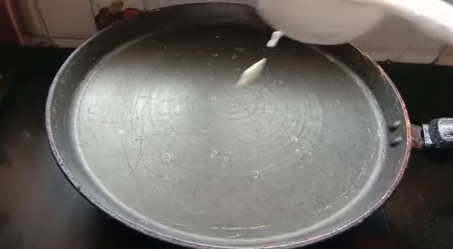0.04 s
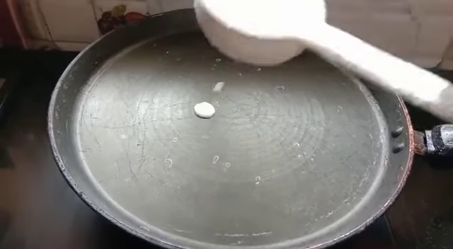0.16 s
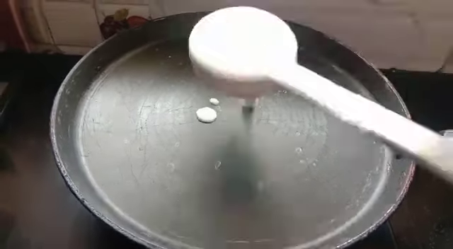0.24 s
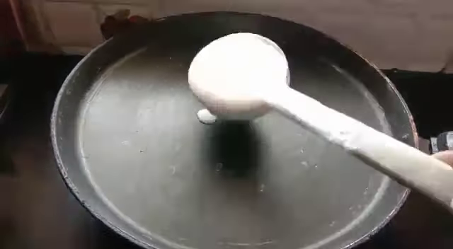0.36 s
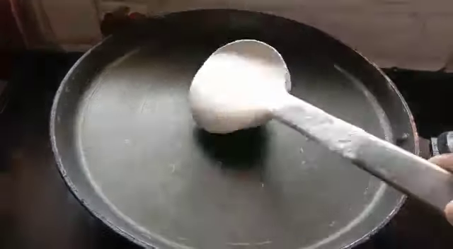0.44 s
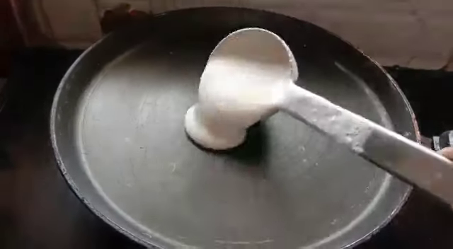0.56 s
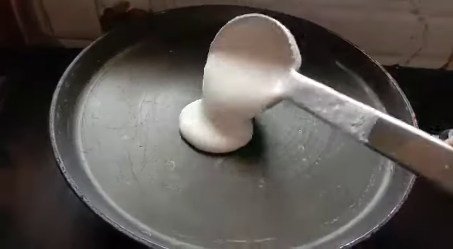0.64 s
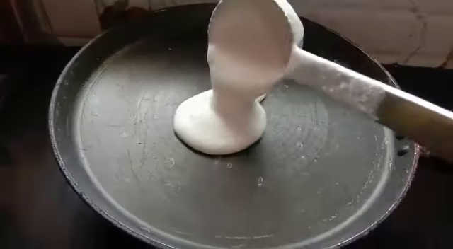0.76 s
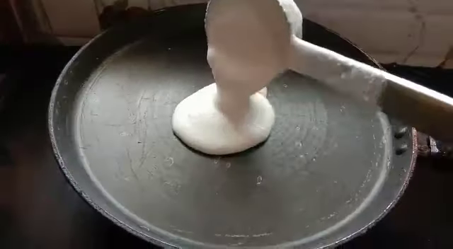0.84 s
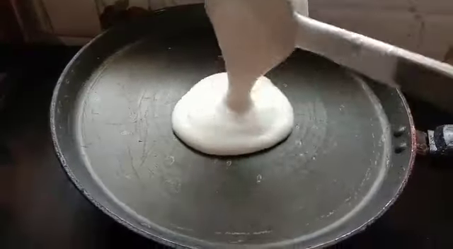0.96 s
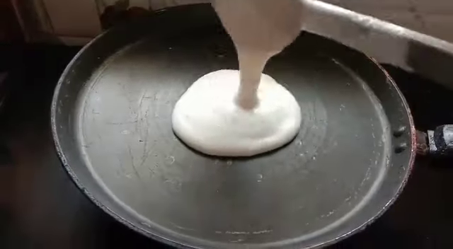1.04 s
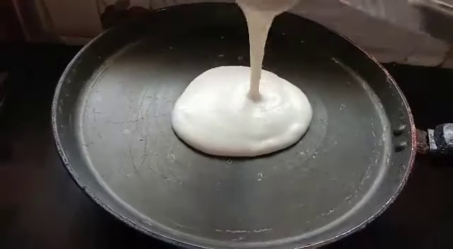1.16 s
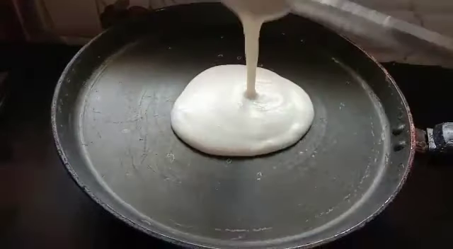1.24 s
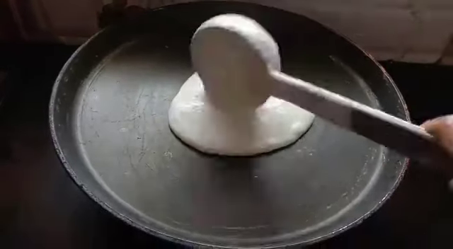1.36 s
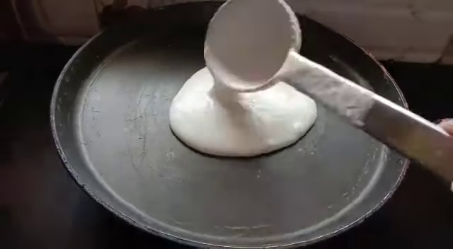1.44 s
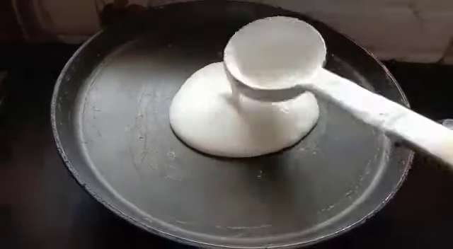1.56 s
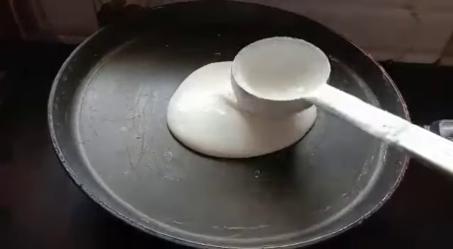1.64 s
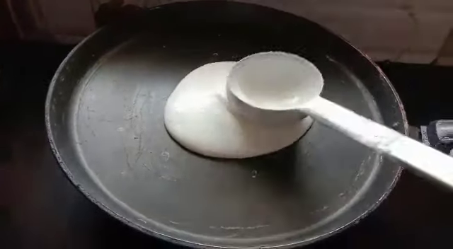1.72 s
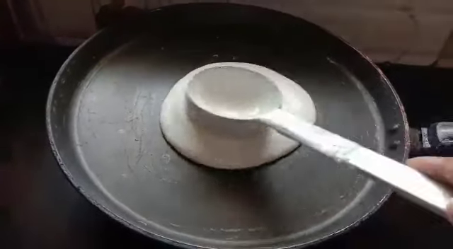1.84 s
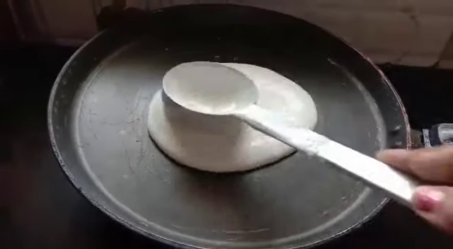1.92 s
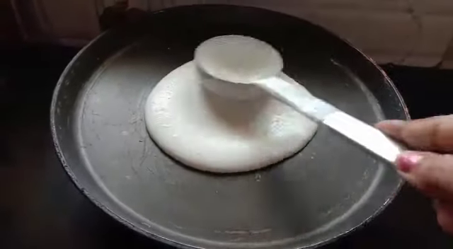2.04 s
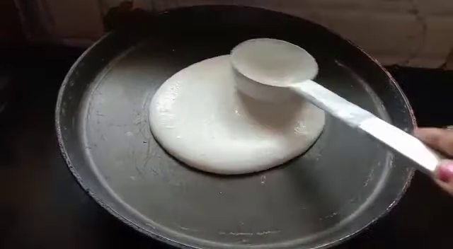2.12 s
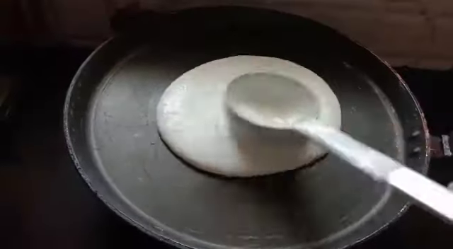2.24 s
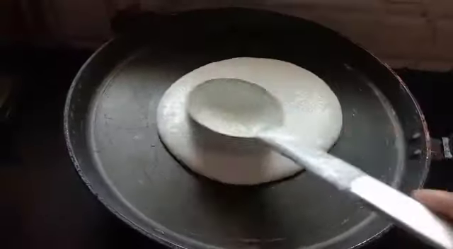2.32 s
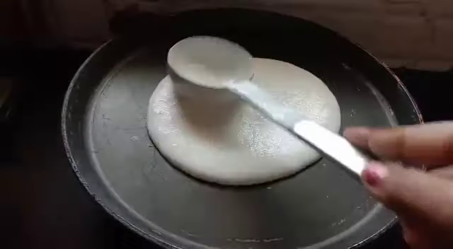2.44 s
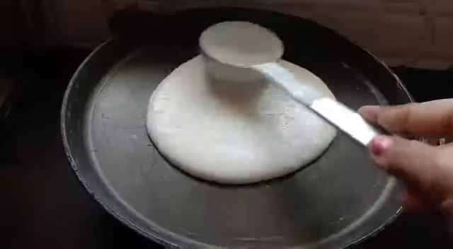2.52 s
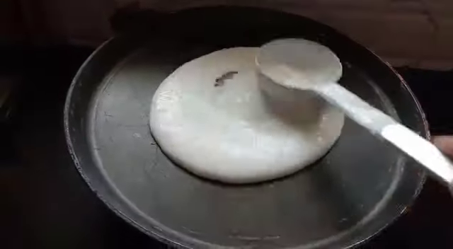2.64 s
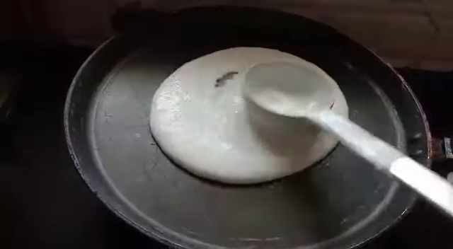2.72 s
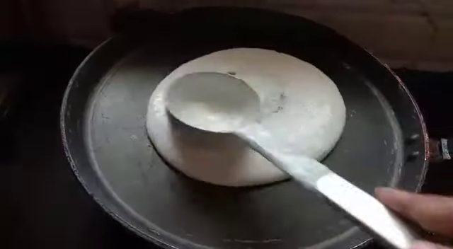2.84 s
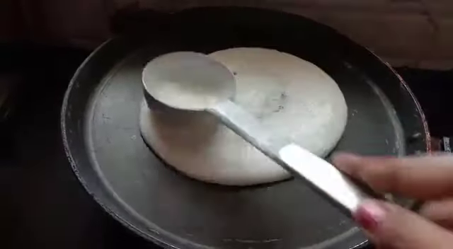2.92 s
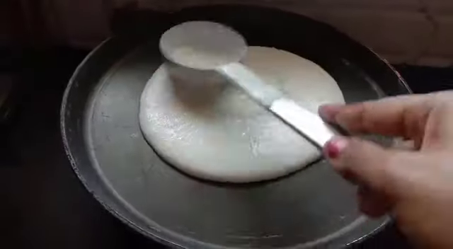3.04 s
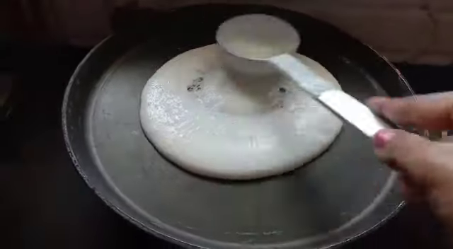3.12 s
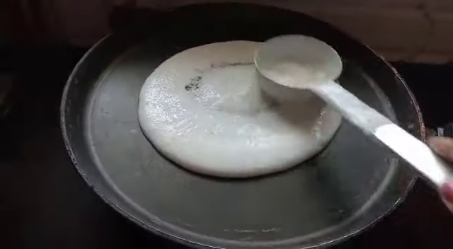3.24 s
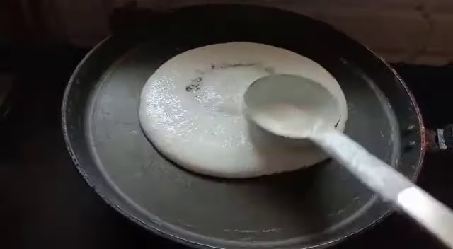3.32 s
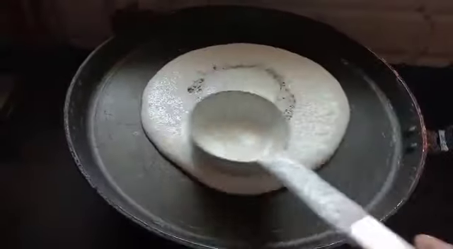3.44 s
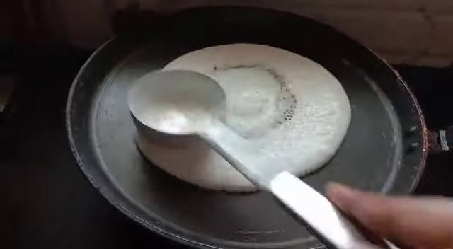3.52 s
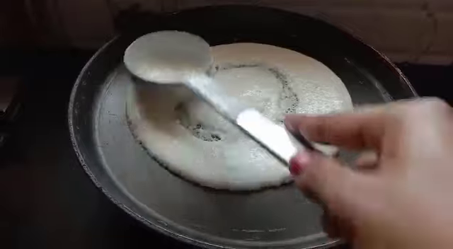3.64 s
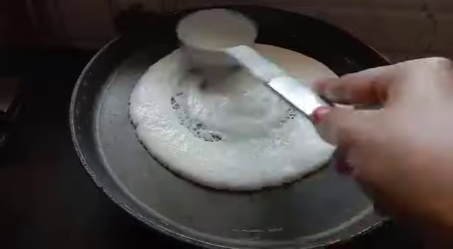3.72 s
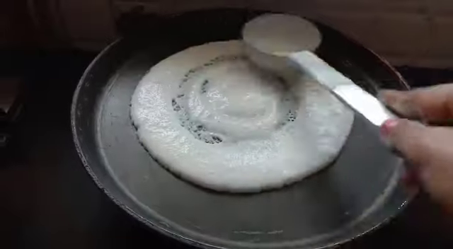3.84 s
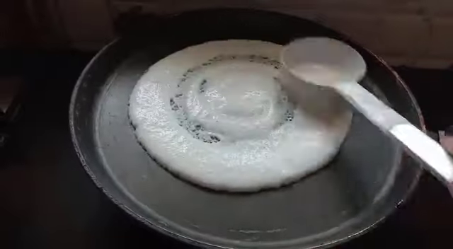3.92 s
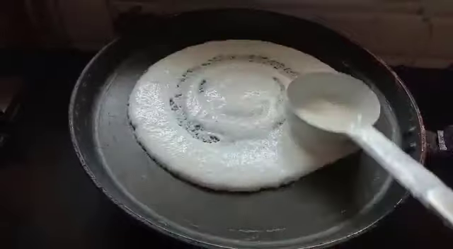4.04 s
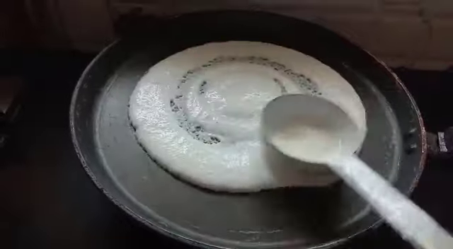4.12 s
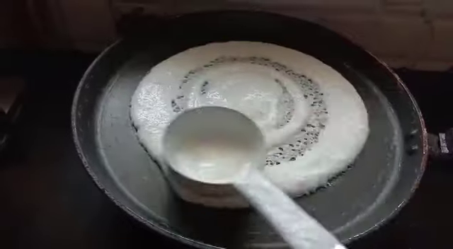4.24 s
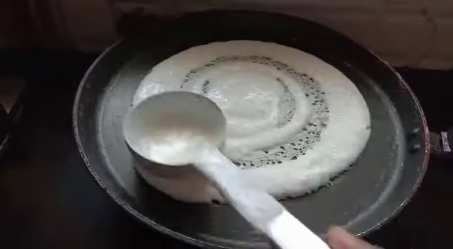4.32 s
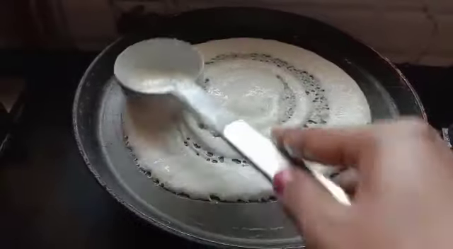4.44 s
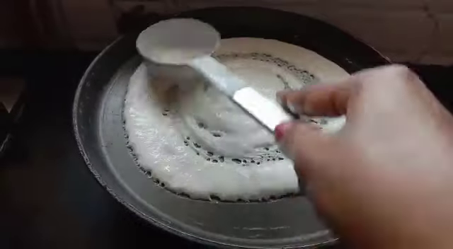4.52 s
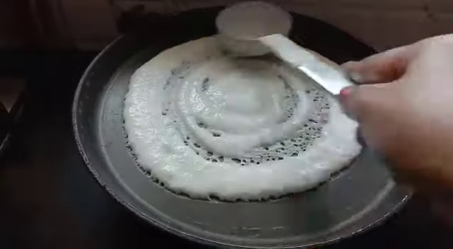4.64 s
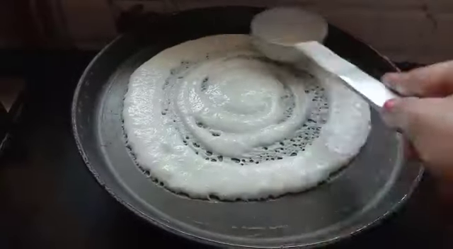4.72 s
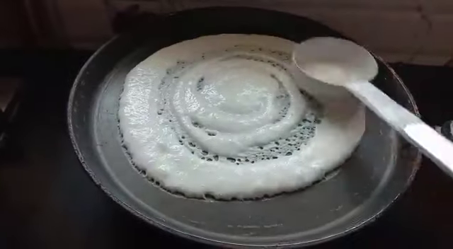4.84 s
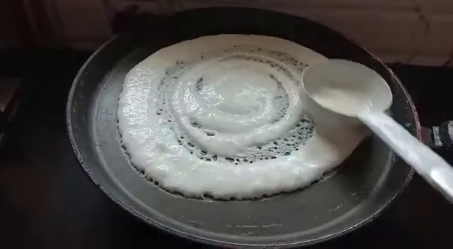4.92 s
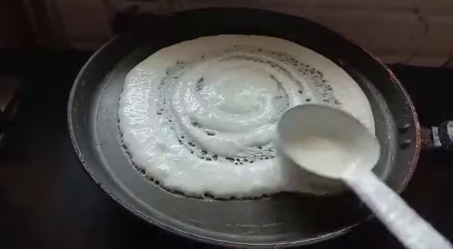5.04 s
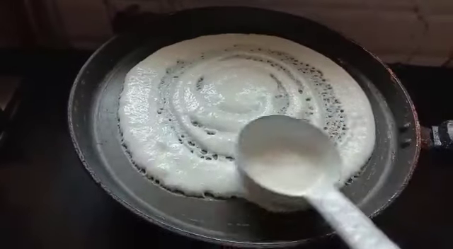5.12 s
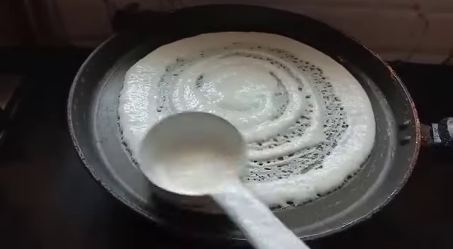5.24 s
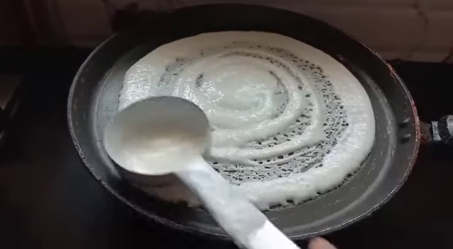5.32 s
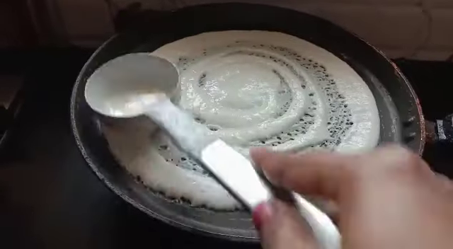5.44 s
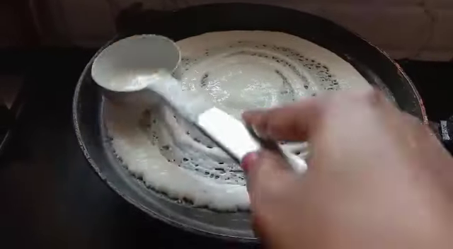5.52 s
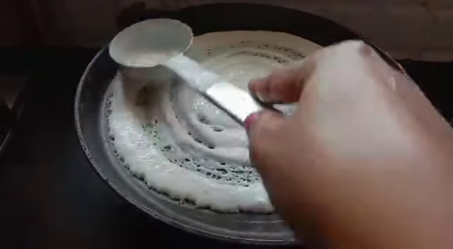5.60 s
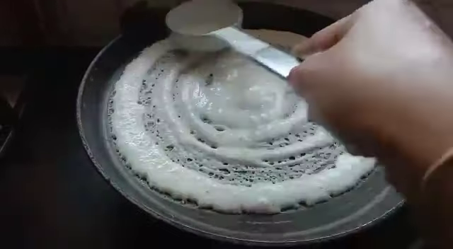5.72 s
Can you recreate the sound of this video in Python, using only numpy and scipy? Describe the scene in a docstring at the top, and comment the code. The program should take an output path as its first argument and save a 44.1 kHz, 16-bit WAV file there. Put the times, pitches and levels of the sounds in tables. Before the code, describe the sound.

Wet batter hits a hot griddle with small hissing splashes, then sizzles ever louder and crackles as a ladle spreads it in circles.

```python
"""Wet batter sizzles on a hot flat griddle, poured and spread by ladle over a gas flame in a small kitchen.
The microphone is close and nearly mono. Tiny steam bursts, made as random clicks, merge into a hiss that
swells with each splash and stroke; larger bubbles sputter, pinholes sing, short crackles stand out, the
ladle squelches. The plate rings as narrow resonances of random knocks. Behind it lie gas jets, the flame's
roar, a low drone and a murmur, as shaped noise, faint gliding tone blips, and quick echoes off close tiles."""
import sys
import numpy as np
from scipy import signal
from scipy.fft import rfft, irfft, next_fast_len
from scipy.io import wavfile
from scipy.ndimage import uniform_filter1d

SR = 44100
rng = np.random.default_rng(int(sys.argv[2]) if len(sys.argv) > 2 else 0)


def transcribe(u):
    """Save the signal u as a 16-bit wav file named by the first command-line argument.

    u: samples, shape (n,) or (channels, n), limited to [-1, 1]; the rate is SR.
    q: integer samples, one column per channel.
    """
    v = np.clip(np.atleast_2d(u).T, -1, 1)
    q = np.round(v * 32767).astype(np.int16)
    wavfile.write(sys.argv[1], SR, q)


N = 254456
TIME = np.arange(N) / SR

# room rumble that differs between the sides: (f/Hz, relative level/dB per Hz)
SIDE_RUMBLE_SPECTRUM = [(20, -6), (80, 1), (130, -5), (210, 3), (320, -7), (450, -40), (1500, -58)]
# low drone of the stove and kitchen, in two bands: (f/Hz, relative level/dB per Hz)
DEEP_DRONE_SPECTRUM = [(15, -39), (40, -15.5), (58, -16), (70, -9.5), (79, 9.5), (88, -7), (100, -10),
                       (140, -14.5), (180, -33), (400, -80)]
UPPER_DRONE_SPECTRUM = [(100, -41), (170, -9), (190, -5.5), (209, 8.5), (232, -11.5), (270, -4.5),
                        (320, -17.5), (400, -79), (800, -95)]
# brief swells of the deep drone: (middle t/s, length t/s, added level/dB)
DEEP_DRONE_SWELLS = [(0.844, 0.13, -49), (2.098, 0.74, -58.5), (4.592, 0.22, -47.5), (5.257, 0.18, -51)]
# middle level of the upper drone: (t/s, level/dB)
UPPER_DRONE_CURVE = [(0, -55), (.45, -63.5), (1.3, -61.5), (2.1, -55.5), (2.9, -52.5), (3.6, -54.5),
                     (3.95, -58.5), (4.35, -60.5), (4.6, -71.5), (5.2, -54), (5.77, -56.5)]
# hiss of the gas jets: (f/Hz, relative level/dB per Hz)
JET_SPECTRUM = [(600, -74), (800, -19), (1100, -5.5), (1330, 3.5), (1700, 0), (1950, 9.5), (2150, 2),
                (2650, -14), (3300, -10.5), (5500, -25), (7300, -17), (9000, -24), (15000, -33)]
# roar of the flame under the plate: (f/Hz, relative level/dB per Hz)
FLAME_SPECTRUM = [(100, -2), (270, 2), (350, 5), (400, -19), (450, -27), (520, -13), (600, 5), (680, -3.5),
                  (820, 6), (1000, -5), (2000, -28), (8000, -31)]
# the flame's roar over time, gone under the sizzle: (t/s, level/dB)
ROAR_CURVE = [(0, -64), (.35, -61), (.75, -52.5), (1.3, -53.5), (1.6, -59), (1.85, -59.5), (2.15, -55.5),
              (2.3, -78), (2.45, -104), (5.77, -110)]
# faint soft-edged low tone blips below the hiss: (middle t/s, f/Hz, level/dB)
PLACED_BLIPS = [(2.046, 614, -62), (2.194, 650, -56), (2.295, 614, -57), (2.44, 596, -60),
                (2.675, 608, -57.5), (2.743, 637, -54.5), (2.97, 350, -58.5), (3.05, 604, -56),
                (3.35, 615, -67), (3.602, 596, -55.5), (3.64, 355, -53), (3.89, 334, -53),
                (3.975, 135, -54), (4.118, 598, -53), (4.345, 630, -54), (4.4, 595, -56),
                (4.464, 700, -54.5), (4.6, 633, -56), (4.648, 611, -52), (5.065, 570, -55.5),
                (5.2, 600, -56), (5.268, 637, -54), (5.345, 510, -60), (5.528, 704, -59)]
# fainter tone blips at random: (lowest f/Hz, highest f/Hz, rate/blips per s, middle level/dB)
RANDOM_BLIPS = [(196.3, 320, 6, -57.5), (758.4, 1020, 20, -56.5)]
# batter lands, or the ladle presses through it: (peak t/s, level/dB, Gaussian spread t/s, f/Hz)
LADLE_SQUELCHES = [(0.295, -46, 0.043, 3600), (0.402, -43.5, 0.0099, 2030), (0.432, -46, 0.013, 2030),
                   (0.422, -43, 0.013, 3700), (0.49, -47, 0.045, 3780), (0.68, -44, 0.027, 2130),
                   (0.666, -39, 0.049, 3950), (1.175, -49, 0.15, 3830), (1.55, -43.5, .018, 3900),
                   (2.17, -45, 0.036, 2050), (2.66, -39, 0.017, 2110), (2.7, -30, 0.025, 6200),
                   (2.847, -41, 0.025, 3800), (2.86, -40.5, 0.057, 1900), (3.188, -39.5, 0.073, 2180),
                   (3.517, -41.5, 0.099, 2110), (3.865, -40, 0.12, 2120), (4.013, -39, 0.33, 3260),
                   (4.203, -37.5, 0.031, 1920), (4.976, -35.5, 0.16, 3550), (5.475, -34.5, .014, 3330),
                   (5.544, -36.5, .03, 3630)]
# rings of the griddle under the bursts: (f/Hz, width f/Hz, relative level/dB)
GRIDDLE_RINGS = [(817, 73, -14.5), (894, 61, -12), (1286, 150, -10), (1527, 100, -14.5), (1998, 69, -10),
                 (2040, 296, -1), (3284, 150, -7.5)]
# short crackles that stand out of the hiss: (start t/s, peak level/dB, f/Hz)
CRACKLES = [(2.245, -31, 3200), (2.662, -35, 1900), (2.846, -25.5, 1990), (3.155, -24, 7000),
            (3.883, -29, 1900), (4.198, -28, 1900), (4.206, -24, 2100), (4.581, -20, 7200)]
# colour of each size of burst: (f/Hz, relative level/dB per Hz)
FIZZ_SPECTRUM = [(600, -74), (2500, -21), (4500, -13.5), (5400, -9.5), (5900, -2), (6200, -4.5), (7200, 1),
                 (7750, 0.5), (8400, -7.5), (9300, -13), (11000, -34), (16000, -33)]
SPUTTER_SPECTRUM = [(560, -46.5), (760, -30), (950, -38), (1080, -12.5), (1300, -7.5), (1650, -3.5),
                    (2150, 0.5), (2550, -2.5), (3250, -1), (3900, 1), (4800, -0.5), (6000, 1), (9000, -15),
                    (16000, -55.5)]
SPRAY_SPECTRUM = [(600, -61), (2000, -76), (6000, -1.5), (8500, -2), (10000, 2.5), (12500, 2), (15000, 3.5),
                  (16000, -4)]
# underlying boil, before the trims: (t/s, fizz level/dB of tiny bursts, sputter level/dB of larger bubbles)
BOIL_CURVE = [(0.0, -70, -65), (0.18, -63, -72), (0.23, -38.5, -55), (0.36, -39.5, -49), (0.52, -41.5, -45),
              (0.8, -37.5, -42.5), (0.95, -39, -43.5), (1.2, -37.5, -41.5), (1.42, -35, -40.5),
              (1.66, -36, -45.5), (1.83, -38.5, -42.5), (2.1, -33.5, -38.5), (2.4, -30.5, -37.5),
              (2.9, -29.5, -38), (2.99, -32, -38), (3.3, -29.5, -38.5), (3.65, -29.5, -39),
              (4.05, -26, -31.5), (4.5, -27.5, -33), (5.08, -27, -32), (5.25, -30.5, -33), (5.41, -32, -36),
              (5.5, -28.5, -34), (5.77, -30, -35.5)]
# batter lands on bare metal and flashes to steam: (start t/s, fizz level/dB before the trim)
STEAM_SPLASHES = [(0.208, -41), (0.392, -43), (0.592, -28.5), (1.525, -35.5), (1.755, -47)]
# the circling ladle pushes wet batter onto hot metal:
# (middle t/s, length t/s, rise and fall t/s, fizz level/dB before the trim)
LADLE_STROKES = [(1.95, 0.16, 0.04, -36), (2.214, 0.24, 0.15, -32), (2.755, 0.3, 0.19, -27),
                 (3.215, 0.18, 0.12, -25.5), (3.513, 0.17, 0.15, -29), (3.86, 0.29, 0.11, -27),
                 (4.267, 0.13, 0.08, -27), (4.76, 0.36, 0.21, -30), (5.623, 0.34, 0.07, -32)]
# the low end dips briefly: (middle t/s, length t/s, lowest f/Hz, highest f/Hz)
LOW_END_DIPS = [(0.257, .06, 520, 775), (0.304, 0.043, 500, 1140), (0.653, 0.071, 410, 660),
                (1.51, 0.056, 480, 720), (1.714, 0.038, 590, 950), (1.79, 0.066, 310, 730),
                (2.45, 0.027, 5, 190), (2.636, 0.047, 400, 1080), (3.111, 0.038, 5, 330),
                (3.168, 0.092, 260, 1110), (3.37, 0.059, 5, 170), (3.731, 0.082, 140, 700),
                (3.8, 0.17, 900, 1250), (3.852, 0.031, 5, 700), (3.936, 0.06, 5, 710),
                (4.047, 0.122, 5, 750), (3.495, 0.03, 5, 150), (4.22, 0.095, 187, 720),
                (4.28, 0.066, 5, 190), (4.48, 0.035, 5, 597), (5.068, 0.14, 5, 470),
                (5.635, 0.054, 400, 1150)]

SIDE_RUMBLE_DB, SIDE_ROAR_DB = -75.5, -12.5   # middle level, and the sides' share of the flame's roar
DEEP_DRONE_DB, JETS_DB = -55, -52.0
MURMUR_DB, MURMUR_STARTS_S, MURMUR_ENDS_S, MURMUR_FADE_DB_PER_S = -67, 0.19, 1.23, 74
BLIPS_FROM_S, BLIP_S, BLIP_GLIDE = 1.9, 0.06, 0.078   # random ones' start, length, share of pitch
KITCHEN_T60_S, ECHO_DB, ECHO_SHIFTS_PER_S = 0.079, -10.5, 1.23
SQUELCH_BUBBLES_PER_S = 3500
SQUELCH_WIDTH, SQUELCH_WANDER = 0.21, 0.05   # resonance width and pitch wander, as shares of the pitch
RING_REST_DEPTH_DB = -29   # at 800 Hz
RING_RESTS_BELOW = -0.3   # a ring rests while its slow chance is under this many spreads
CRACKLE_DECAY_S, CRACKLE_WIDTH = 0.0023, 0.54   # resonance width as a share of the pitch
SPLASH_ATTACK_S, SPLASH_HOLD_S, SPLASH_FALL_DB_PER_S = 0.025, 0.026, 154
FRESH_SPUTTER_DB, FRESH_SPRAY_DB = -10, -8   # fresh batter, against its fizz, before the trims
BOIL_SPRAY_DB = -8   # underlying boil, against its fizz, before the trims
SPUTTER_LAG_S = 0.01   # larger bubbles take longer to grow and to die away
FLURRIES_PER_S, FLURRY_S = 190, 0.0034   # steam pockets tearing open, and decay time of each
FIZZ_TRIM_DB, SPRAY_TRIM_DB, SPUTTER_TRIM_DB = -0.08, 1.5, 1.32
PAN_LOW_CUT_HZ, CUTOFF_HZ = 760, 15600
DIP_DB, DIP_EDGE_S = -38, 0.018


def from_db(db):
    """Decibels to gain."""
    return 10 ** (np.asarray(db) / 20)


def rms_one(x):
    """Scale to unit power."""
    return x / np.sqrt(np.mean(x ** 2) + 1e-20)


def in_time(rows):
    """Each column of a curve at every sample."""
    s, *columns = np.transpose(rows)
    return [np.interp(TIME, s, c) for c in columns]


def swell(middle_s, length_s):
    """A smooth rise from 0 to 1 and back."""
    return np.cos(np.pi * np.clip((TIME - middle_s) / length_s, -.5, .5))


def plateau(middle_s, length_s, edge_s):
    """A rounded rise from 0 to 1, a hold and a fall; the length is taken at half height."""
    inside_s = length_s / 2 - np.abs(TIME - middle_s)
    return np.sin(np.pi / 2 * np.clip(inside_s / edge_s + .5, 0, 1)) ** 2


def lagging(power, lag_s):
    """Follow a level with an exponential lag."""
    keep = np.exp(-1 / (lag_s * SR))
    return signal.lfilter([1 - keep], [1, -keep], power)


def drift(rate):
    """Smooth chance of spread 1, changing about rate times a second."""
    size = 8192
    speed = np.arange(size // 2 + 1) * SR / N / rate
    slow = irfft(rfft(rng.standard_normal(size)) / (1 + speed ** 2 + (speed / 3) ** 6))
    return np.interp(np.arange(N) * size / N, np.arange(size), rms_one(slow))


def colour(x, spectrum):
    """Causal (minimum-phase) filter that follows a spectrum; unit power out."""
    size = 4096
    hz, db = np.transpose(spectrum)
    bins = np.maximum(np.arange(size // 2 + 1) * SR / size, 1)
    cepstrum = irfft(np.log(from_db(np.interp(np.log(bins), np.log(hz), db))))
    # folding the cepstrum onto positive time gives minimum phase
    cepstrum[1:size // 2] *= 2
    cepstrum[size // 2 + 1:] = 0
    response = irfft(np.exp(rfft(cepstrum)))
    return rms_one(signal.fftconvolve(x, response)[:N])


def resonate(x, hz, width_hz):
    """One resonance with steep skirts; unit power out."""
    edges = [max(hz - width_hz / 2, 15), hz + width_hz / 2]
    band = signal.butter(2, edges, "band", fs=SR, output="sos")
    return rms_one(signal.sosfilt(band, x + 1e-18))


def lumpy(spectrum, flutter_db, flutter_rate):
    """Coloured noise that comes in soft lumps about an even level."""
    noise = colour(rng.standard_normal(N), spectrum) * from_db(flutter_db * drift(flutter_rate))
    power = uniform_filter1d(uniform_filter1d(noise ** 2, size=6000), size=2000)
    return noise / np.sqrt(power + 1e-9)


def bursts(per_s, spread_db, clump_db, clump_rate):
    """Random clicks of uneven size whose strength drifts, as steam pockets tear open."""
    born = rng.random(N) < per_s / SR
    sizes = from_db(spread_db * np.minimum(rng.exponential(1, N), 5))
    clicks = born * sizes * rng.choice([-1, 1], N) / np.sqrt(per_s)
    return rms_one(clicks * from_db(clump_db * drift(clump_rate)))


def room_width():
    """Rumble and flame roar reach the two sides in opposite polarity."""
    roar_db, = in_time(ROAR_CURVE)
    rumble_gain = from_db(SIDE_RUMBLE_DB + 5.1 * drift(7.4))
    rumble = rumble_gain * colour(rng.standard_normal(N), SIDE_RUMBLE_SPECTRUM)
    roar = from_db(roar_db + SIDE_ROAR_DB) * colour(rng.standard_normal(N), FLAME_SPECTRUM)
    return (rumble + roar) * np.array([[1], [-1]])


def drone():
    """Two bands of lumpy low noise whose levels waver; the deep one also swells briefly."""
    swells = sum(from_db(db) * swell(s, length) ** 2 for s, length, db in DEEP_DRONE_SWELLS)
    deep_gain = (from_db(DEEP_DRONE_DB) + swells) * from_db(2.1 * drift(3.6))
    deep = deep_gain * lumpy(DEEP_DRONE_SPECTRUM, flutter_db=9.5, flutter_rate=2.4)
    upper_db, = in_time(UPPER_DRONE_CURVE)
    upper_gain = from_db(upper_db + 3.1 * drift(22))
    upper = upper_gain * lumpy(UPPER_DRONE_SPECTRUM, flutter_db=12.5, flutter_rate=2.34)
    return deep + upper


def burner():
    """Turbulent gas: steady noise for the jets and softer noise for the flame's roar."""
    roar_db, = in_time(ROAR_CURVE)
    jets = from_db(JETS_DB) * colour(rng.standard_normal(N), JET_SPECTRUM)
    flame = from_db(roar_db) * colour(rng.standard_normal(N), FLAME_SPECTRUM)
    return jets + flame


def murmur(hz=470, width_hz=130):
    """A hollow, wavering band of noise that comes and goes with the pour."""
    outside_s = np.abs(TIME - np.clip(TIME, MURMUR_STARTS_S, MURMUR_ENDS_S))
    level_db = MURMUR_DB - MURMUR_FADE_DB_PER_S * outside_s + 2.3 * drift(7.1)
    return from_db(level_db) * resonate(rng.standard_normal(N), hz, width_hz)


def tone_blips(spread_db=5.0):
    """Faint soft-edged gliding low tones below the hiss; the random ones come at uneven intervals."""
    out, blips = np.zeros(N), list(PLACED_BLIPS)
    span_s = TIME[-1] - BLIPS_FROM_S
    for low, high, per_s, db in RANDOM_BLIPS:
        for k, (when, pitch, size) in enumerate(rng.random((int(per_s * span_s), 3))):
            middle_s = BLIPS_FROM_S + (k + 2 * when) / per_s
            blips.append((middle_s, low * (high / low) ** pitch, db + spread_db * (2 * size - 1)))
    for s, hz, db in blips:
        slope = rng.uniform(-0.85, 1)
        near = slice(*np.searchsorted(TIME, [s - BLIP_S / 2, s + BLIP_S / 2]))
        through = (TIME[near] - s) / BLIP_S
        phase = 2 * np.pi * np.cumsum(hz * (1 + BLIP_GLIDE * slope * through)) / SR
        out[near] += from_db(db) * np.cos(np.pi * through) ** 2 * np.sqrt(2) * np.sin(phase)
    return out


def kitchen(x, count=6):
    """Close tiles and counter return scattered quick echoes, shifting as hand and ladle move over the pan."""
    after = TIME[:SR // 5]
    weights = np.array([drift(ECHO_SHIFTS_PER_S) for _ in range(count)])
    out = 0
    for weight in weights / np.linalg.norm(weights, axis=0):
        arrives = (rng.random(len(after)) < 1500 / SR) & (after > .002)
        walls = arrives * rng.standard_normal(len(after)) * from_db(-60 * after / KITCHEN_T60_S)
        out = out + weight * signal.fftconvolve(x, walls / np.linalg.norm(walls))[:N]
    return from_db(ECHO_DB) * out


def ladle():
    """Each squelch is a swell of wet bubbles whose size, and so their pitch, wanders."""
    bubbles = bursts(SQUELCH_BUBBLES_PER_S, spread_db=0.9, clump_db=0.5, clump_rate=65)
    warped = TIME + np.cumsum(SQUELCH_WANDER * drift(12)) / SR   # uneven reading speed bends the pitch
    out = 0
    for s, db, spread_s, hz in LADLE_SQUELCHES:
        shape = np.exp(-.5 * ((TIME - s) / spread_s) ** 2)
        wet = np.interp(warped, TIME, resonate(bubbles, hz, SQUELCH_WIDTH * hz))
        out = out + from_db(db) * shape * wet
    return out


def griddle(sputter_db):
    """Collapsing bubbles knock the batter-damped plate into ringing, each ring with brief rests."""
    knocks = bursts(8000, spread_db=0.5, clump_db=-0.5, clump_rate=160)
    rings = 0
    for hz, width, db in GRIDDLE_RINGS:
        resting = .5 + .5 * np.tanh(2.8 * (RING_RESTS_BELOW - drift(9.3)))
        rest_db = RING_REST_DEPTH_DB * (800 / hz) ** 2 * resting   # shallower in the higher rings
        rings = rings + from_db(db) * rms_one(resonate(knocks, hz, width) * from_db(rest_db))
    return from_db(-40.0 + 0.81 * (sputter_db + 27.5)) * rings


def crackles():
    """Short puffs of resonant noise that start at once, decay in milliseconds and stand out of the hiss."""
    noise, out = rng.standard_normal(N), 0
    for s, db, hz in CRACKLES:
        puff = (TIME > s) * np.exp(-np.abs(TIME - s) / CRACKLE_DECAY_S)
        out = out + from_db(db) * puff * resonate(noise, hz, CRACKLE_WIDTH * hz)
    return out


def vents(fizz_db, count=900, half_open_s=.05, waver_hz=80):
    """Steam escapes through pinholes in the batter; each sings at its own unsteady pitch, then closes."""
    out = np.zeros(N)
    for when, pitch in rng.random((count, 2)):
        middle_s = when * TIME[-1]
        near = slice(*np.searchsorted(TIME, middle_s + np.array([-half_open_s, half_open_s])))
        opening = np.cos(np.pi / 2 * (TIME[near] - middle_s) / half_open_s) ** 2
        waver = np.cumsum(rng.standard_normal(len(opening))) * np.sqrt(2 * np.pi * waver_hz / SR)
        hz = 2500 * 4.0 ** pitch
        out[near] += opening * np.sin(2 * np.pi * hz * TIME[near] + waver)
    song = colour(out, [(2500, -20), (5000, 1.5), (6000, 1.5), (7400, 10.5), (9000, -0.5)])
    return from_db(fizz_db - 10.0) * song


def boil():
    """Levels in dB of fizz, sputter and spray: underlying boil plus the steam of each splash and stroke."""
    fizz_db, sputter_db = in_time(BOIL_CURVE)
    # levels add as powers
    fresh = sum((from_db(db) * plateau(s, length, edge)) ** 2 for s, length, edge, db in LADLE_STROKES)
    for s, db in STEAM_SPLASHES:
        attack = np.clip((TIME - s) / SPLASH_ATTACK_S, 0, 1)
        cooling_s = np.maximum(TIME - s - SPLASH_ATTACK_S - SPLASH_HOLD_S, 0)
        fresh = fresh + (attack * from_db(db - SPLASH_FALL_DB_PER_S * cooling_s)) ** 2
    fizz = from_db(fizz_db) ** 2 + fresh
    sputter = from_db(sputter_db) ** 2 + from_db(FRESH_SPUTTER_DB) ** 2 * lagging(fresh, SPUTTER_LAG_S)
    spray = from_db(fizz_db + BOIL_SPRAY_DB) ** 2 + from_db(FRESH_SPRAY_DB) ** 2 * fresh
    return 10 * np.log10([fizz, sputter, spray])


def sizzle(fizz_db, sputter_db, spray_db):
    """Three sizes of steam burst; the harder the boil, the more of them and the smoother the hiss."""
    vigour = from_db(.2 * (fizz_db - np.max(fizz_db)))
    # each tearing pocket lets go a flurry of sharp pops that starts at once and dies away
    flurries = lagging(1e-18 + (rng.random(N) < FLURRIES_PER_S / SR), FLURRY_S)
    pops = bursts(5000 * vigour, spread_db=0.0, clump_db=0.5, clump_rate=12)
    pops = rms_one(pops * np.sqrt(flurries))
    # the same pops sound across all three sizes
    tiny = bursts(16000 * vigour, spread_db=0.5, clump_db=0.66, clump_rate=45) + 0.7 * pops
    fine = bursts(20000 * vigour, spread_db=1.5, clump_db=0.7, clump_rate=52) + 0.52 * pops
    large = bursts(10000 * vigour, spread_db=1.5, clump_db=0.67, clump_rate=20) + 0.51 * pops
    fizz = from_db(fizz_db + FIZZ_TRIM_DB) * colour(tiny, FIZZ_SPECTRUM)
    spray = from_db(spray_db + SPRAY_TRIM_DB) * colour(fine, SPRAY_SPECTRUM)
    sputter = from_db(sputter_db + SPUTTER_TRIM_DB) * colour(large, SPUTTER_SPECTRUM)
    return fizz + spray + sputter


def low_dips(x):
    """A stretch of the low end drops away abruptly and comes back."""
    size = next_fast_len(N)
    hz = np.arange(size // 2 + 1) * SR / size + 1   # 1 Hz up, clear of zero
    spectrum = rfft(x, size)
    for s, length, low, high in LOW_END_DIPS:
        band = irfft(spectrum / (1 + (low / hz) ** 24) / (1 + (hz / high) ** 24), size)[..., :N]
        x = x - (1 - from_db(DIP_DB)) * plateau(s, length, DIP_EDGE_S) * band
    return x


def scene():
    """The pan sits in the middle; only the room's low sounds differ between the sides."""
    fizz_db, sputter_db, spray_db = boil()
    background = drone() + burner() + murmur() + tone_blips() + room_width()
    pan = ladle() + griddle(sputter_db) + crackles() + vents(fizz_db) + sizzle(fizz_db, sputter_db, spray_db)
    low_cut = signal.cheby1(14, .5, PAN_LOW_CUT_HZ, "high", fs=SR, output="sos")
    pan = signal.sosfilt(low_cut, pan)
    return low_dips(background + kitchen(pan) + pan)


def record(dry):
    """The top is cut steeply."""
    top_cut = signal.ellip(12, .1, 80, CUTOFF_HZ, fs=SR, output="sos")
    return signal.sosfilt(top_cut, dry)


dry = scene()
out = record(dry)
transcribe(out)
```